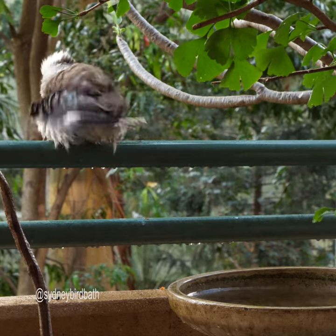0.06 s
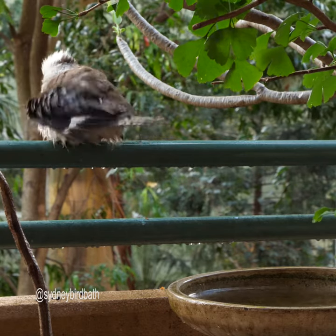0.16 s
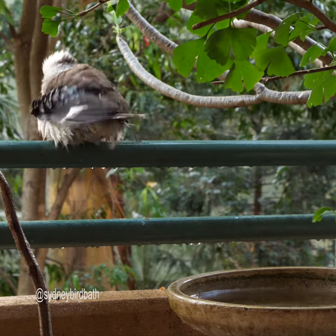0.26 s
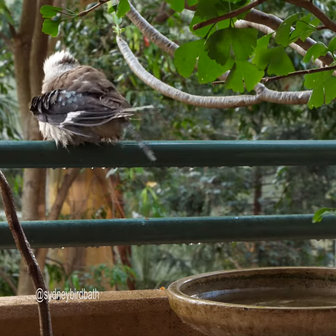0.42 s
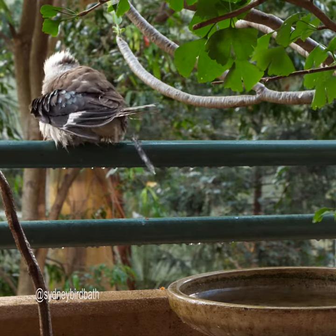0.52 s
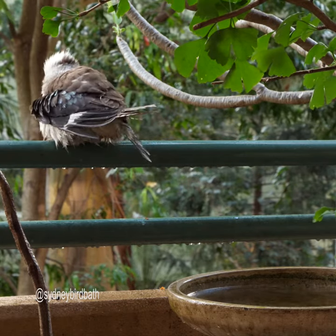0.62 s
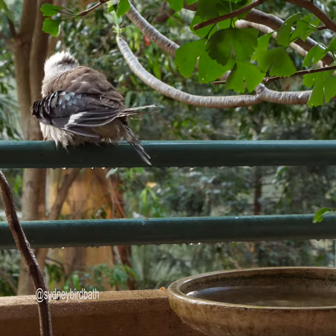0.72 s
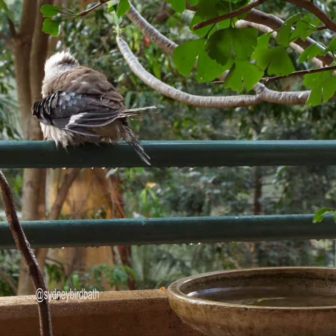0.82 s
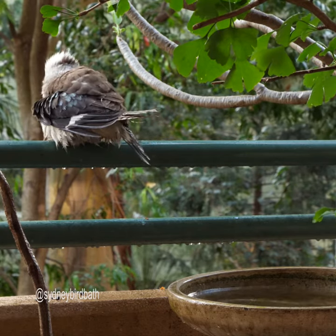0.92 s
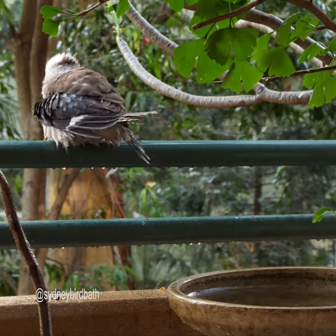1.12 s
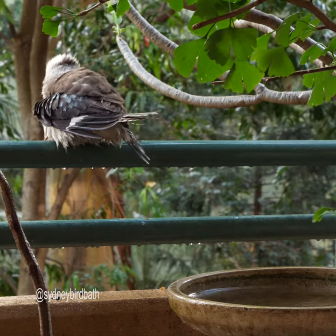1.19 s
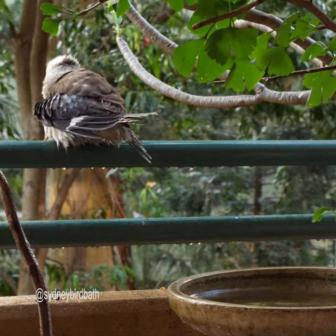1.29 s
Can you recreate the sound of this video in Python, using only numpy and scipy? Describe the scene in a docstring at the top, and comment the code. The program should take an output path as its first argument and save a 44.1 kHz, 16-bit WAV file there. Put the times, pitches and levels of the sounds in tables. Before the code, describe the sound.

A kookaburra opens with a rasping grumble dotted with soft clucks. At about 0.4 seconds it gives one harsh, hissing squawk that fades by 0.7 with a slight garden echo. Wind rumbles low on the microphone, mostly from 0.5 to 1 second. Just after 1 second a small bird whistles faintly far off, and quick, wheezy kookaburra clucks run into another rasp from about 1.2 seconds.

```python
"""A rasping grumble with soft clucks in it comes from a kookaburra on a garden railing; then one harsh,
hissing squawk, a pause, and clucks that run into another rasp. Uneven pulses of turbulent air excite
the resonances of its throat, clearing into two tones for each cluck; nearby walls and trees answer.
A small bird whistles faintly far off, and wind rumbles on the microphone."""
import sys
import numpy as np
from scipy import signal
from scipy.fft import rfft, irfft, next_fast_len
from scipy.io import wavfile
from scipy.ndimage import uniform_filter1d, map_coordinates

SR = 44100
rng = np.random.default_rng(int(sys.argv[2]) if len(sys.argv) > 2 else 0)


def waveform_to_disk(signal):
    """Save audio, clipped to [-1, 1], as 16-bit WAV at the path in sys.argv[1]."""
    frames = np.transpose(np.atleast_2d(signal))
    scaled = np.clip(frames, -1, 1) * 32767
    samples = np.round(scaled).astype(np.int16)
    wavfile.write(sys.argv[1], SR, samples)


N = 59535

# Left-right coherence of the voice and echo, and of the clucks and last rasp: f/Hz, coherence
VOICE_COHERENCE = [(700, 0.81), (1200, 0.76), (1700, 0.7), (2100, .05), (2700, 0.48), (3800, -0.26),
                   (6000, -0.12), (9000, -0.081)]
CLUCK_COHERENCE = [(1300, 0.78), (2400, 0.79), (4200, 0.6), (5500, 0.28)]


def amp(db):
    """Decibels to amplitude ratio."""
    return 10 ** (np.asarray(db) / 20)

def unit(x):
    """Normalisation to rms 1."""
    return x / np.sqrt(np.mean(x ** 2) + 1e-20)

def along(points, hz):
    """Interpolation on a logarithmic frequency axis."""
    f, values = np.transpose(points)
    return np.interp(np.log(hz + 1), np.log(f + 1), values)

def curves(rows):
    """Linear interpolation in time, one curve for each column after the first."""
    times, *columns = np.transpose(rows)
    return [np.interp(np.arange(N) / SR, times, column) for column in columns]

def during(rows, fade_s=0.013):
    """Trapezoidal window: 1 over the rows' time span, fading on either side."""
    t = np.arange(N) / SR
    return np.clip(1 + np.minimum(t - rows[0][0], rows[-1][0] - t) / fade_s, 0, 1)

def wobble(rate):
    """Random modulation: a spline through `rate` random knots a second."""
    return map_coordinates(rng.standard_normal(int(N * rate / SR) + 4), [np.arange(N) * rate / SR])

def filtered(x, response):
    """Linear filtering: the spectrum times a frequency response."""
    size = next_fast_len(N + SR // 2)
    return irfft(rfft(x, size) * response(np.fft.rfftfreq(size, 1 / SR)), size)[..., :N]

def resonances(table, hz):
    """Gain of steep-sided resonances that add in power, with little below the first."""
    power = sum(amp(db) ** 2 / (1 + ((hz - centre) / (.75 * width)) ** 2) ** 3
                for centre, width, db in table)
    return np.sqrt(power / (1 + (.7 * table[0][0] / (hz + 1)) ** 8))

def spread(pair, coherence):
    """Mid-side mixing gives two independent signals a set left-right coherence."""
    angle = lambda hz: np.arccos(np.clip(along(coherence, hz), -1, 1)) / 2
    mid, side = filtered(pair, lambda hz: np.array([np.cos(angle(hz)), np.sin(angle(hz))]))
    return np.array([mid + side, mid - side])

def steady(x, window_s=0.013):
    """Division by the running rms evens out the chance swells of a noise."""
    power = uniform_filter1d(np.mean(x ** 2, 0), int(window_s * SR))
    return x / np.sqrt(np.abs(power) + 1e-20)

def garden(level_db=-52):
    """Ambient noise: steady, and coherent between the ears only at low frequencies."""
    spectrum = [(59, -9.5), (100, -3.5), (209, -10.5), (290, -11.5), (600, -19), (760, -18), (916, -23),
                (1960, -24.5), (15500, -34.5)]  # f/Hz, relative level/dB
    coherence = [(300, 0.99), (1200, 0.87), (2500, 0.01)]  # f/Hz, left-right coherence
    air = filtered(rng.standard_normal((2, N)), lambda hz: amp(along(spectrum, hz)))
    return amp(level_db) * unit(spread(air, coherence))

def wind(buffet_trim_db=-1, drift=0.059, side_db=-33):
    """Pressure fluctuations of wind: a deep throb and softer buffeting, nearly alike in both ears."""
    throb_pitch = [(0.0, 28), (.3, 31.1), (.55, 28), (.8, 25.3), (.88, 17.7), (1.05, 21), (1.35, 20.8)]  # t/s, f/Hz
    throb_levels = [(0.0, -48.5), (0.282, -29.5), (0.42, -42), (0.506, -21), (0.54, -18), (0.646, -21),
                    (0.676, -35.5), (0.714, -17.5), (0.74, -17), (0.774, -26), (0.816, -17.5), (0.864, -27),
                    (0.906, -21), (1.048, -34.5), (1.16, -37), (1.35, -49)]  # t/s, level/dB
    buffet_spectrum = [(20, -37), (45, 7), (60, 0.5), (85, 2.5), (110, -22), (135, -5.5), (200, -23),
                       (400, -26), (900, -86)]  # f/Hz, relative level/dB
    buffet_levels = [(0, -47.5), (.13, -58), (.245, -40), (.3, -44.5), (.58, -48.5), (.63, -42), (.76, -43),
                     (1.0, -51), (1.35, -54.5)]  # t/s, level/dB before the trim
    pitch = curves(throb_pitch)[0] * np.exp(drift * wobble(12))
    throb = unit(np.sin(2 * np.pi * np.cumsum(pitch) / SR))
    mid, side = unit(filtered(rng.standard_normal((2, N)), lambda hz: amp(along(buffet_spectrum, hz))))
    buffet = steady(np.array([mid + amp(side_db) * side, mid - amp(side_db) * side]), window_s=0.051)
    return amp(curves(throb_levels)[0]) * throb + amp(curves(buffet_levels)[0] + buffet_trim_db) * buffet

def echo(x, level_db=-5.5):
    """Reverberation: reflections from walls and trees decay exponentially, the midrange slowest."""
    decay_times = [(500, 0.13), (1400, 0.82), (4000, 0.83), (8000, 0.59), (14000, 0.31)]  # f/Hz, T60/s
    hz, t, noise = signal.stft(rng.standard_normal((2, SR)), SR, nperseg=256)
    tail = signal.istft(noise * amp(-60 * t / along(decay_times, hz)[:, None]), SR, nperseg=256)[1]
    reflections = signal.fftconvolve(x, tail / np.linalg.norm(tail[0]), axes=1)[:, :N]
    return amp(level_db) * spread(reflections, VOICE_COHERENCE)

def far_bird(waver=0.0112, flutter_db=4.0):
    """Two faint, overlapping whistles glide under random frequency and amplitude modulation."""
    # Whistled notes: t/s, f/Hz, level/dB
    upper_note = [(1.025, 3180, -71), (1.047, 3380, -74), (1.061, 3520, -57), (1.078, 3350, -74),
                  (1.095, 3345, -58.5), (1.13, 2880, -66)]
    lower_note = [(1.065, 2740, -66), (1.093, 3020, -61)]
    out = np.zeros(N)
    for note in (upper_note, lower_note):
        pitch, level = curves(note)
        tone = np.sin(2 * np.pi * np.cumsum(pitch * (1 + waver * wobble(300))) / SR)
        out += amp(level + flutter_db * wobble(150)) * during(note) * unit(tone)
    return out

def hiss(levels, band):
    """Turbulent air, filtered by a resonance, swells and fades."""
    air = filtered(rng.standard_normal((2, N)), lambda hz: resonances(band, hz))
    return amp(curves(levels)[0]) * during(levels) * steady(spread(air, VOICE_COHERENCE))

def wheeze():
    """Turbulence in two high resonances: a thin hiss that leads into the later clucks."""
    levels = [(1.0, -71), (1.04, -58.5), (1.2, -60)]  # t/s, level/dB
    band = [(2786, 860, -9.5), (5540, 760, -6.5)]  # resonances: f/Hz, nominal width/Hz, relative level/dB
    return hiss(levels, band)

def chest(voice, relative_db=-20):
    """Amplitude modulation: a weak, low rush follows the envelope of the voice."""
    band = [(278, 42, 1.5), (441, 146, -2)]  # resonances: f/Hz, nominal width/Hz, relative level/dB
    envelope = np.sqrt(np.abs(uniform_filter1d(np.mean(voice ** 2, 0), size=900)))
    rush = unit(filtered(rng.standard_normal(N), lambda hz: resonances(band, hz)))
    return amp(relative_db) * envelope * rush

def hollow_note(pitch_hz=866, waver=0.0158):
    """A nearly pure tone, slightly frequency-modulated, sounds through the last rasp."""
    levels = [(1.24, -68), (1.265, -51.5), (1.3, -47.5), (1.35, -66)]  # t/s, level/dB
    tone = np.sin(2 * np.pi * np.cumsum(pitch_hz * (1 + waver * wobble(149))) / SR)
    return amp(curves(levels)[0]) * during(levels) * unit(tone)

def syrinx(coherence, pulse_hz, jitter, rattle):
    """Pulse-modulated turbulence: air let through in uneven puffs, their depth set by `rattle`."""
    cycles = np.cumsum(pulse_hz * np.exp(jitter * wobble(pulse_hz))) / SR
    puffs = np.exp(rattle * np.cos(2 * np.pi * cycles))
    return spread(puffs * rng.standard_normal((2, N)), coherence)

def call(levels, throat, source, low_trim_db, treble_trim_db, crossover_hz=2760):
    """Source-filter model: the source excites the throat; low and treble bands swell separately."""
    treble_share = lambda hz: 1 / (1 + (crossover_hz / (hz + 1)) ** 16)
    low = steady(filtered(source, lambda hz: resonances(throat, hz) * (1 - treble_share(hz))))
    treble = steady(filtered(source, lambda hz: resonances(throat, hz) * treble_share(hz)))
    low_db, treble_db = curves(levels)
    return during(levels) * (amp(low_db + low_trim_db) * low + amp(treble_db + treble_trim_db) * treble)

def grumble():
    """Strongly jittered pulses excite broad formants: the opening rasp."""
    levels = [(0.0, -44, -49.5), (.034, -49.5, -52.5), (.084, -45.5, -48.5), (.13, -49, -53.5),
              (.165, -47.5, -50.5), (.234, -46.5, -57.5), (.274, -44, -47.5), (.304, -47.5, -48),
              (.37, -60, -59.5)]  # t/s, low level/dB, treble level/dB, before the trims
    throat = [(810, 330, -16), (1308, 475, 0), (1953, 320, -1.5), (2980, 260, -11.5), (4070, 900, -9),
              (5410, 390, -12), (6300, 2050, -18.5), (9500, 4600, -28)]  # formants: f/Hz, nominal width/Hz, relative level/dB
    source = syrinx(VOICE_COHERENCE, pulse_hz=251.3, jitter=0.62, rattle=0.14)
    return call(levels, throat, source, low_trim_db=0.5, treble_trim_db=2.5)

def rasp():
    """Faster, deeper modulation of the airflow roughens the closing call."""
    levels = [(1.212, -41, -54), (1.22, -51, -48), (1.24, -41, -45.5), (1.251, -51, -49.5),
              (1.266, -38.5, -41), (1.287, -40.5, -40), (1.325, -47, -50), (1.35, -37, -41)]  # t/s, low level/dB, treble level/dB, before the trims
    throat = [(857, 130, -9), (1294, 320, 1), (1840, 170, -3), (2123, 220, -1), (2570, 130, -9),
              (3080, 240, -18.5), (4030, 680, -6), (4360, 200, -1.5), (5400, 550, -10.5), (6100, 1840, -18),
              (8860, 3700, -26)]  # formants: f/Hz, nominal width/Hz, relative level/dB
    source = syrinx(CLUCK_COHERENCE, pulse_hz=417.8, jitter=0.2, rattle=0.52)
    return call(levels, throat, source, low_trim_db=-2, treble_trim_db=0)

def clucks(upper_ratio=1.62, waver=0.0258, attack_s=0.0041, release_s=0.0076):
    """Two inharmonic partials share each short note's power with turbulence in a half-closed throat."""
    # t/s, time to release/s, level/dB, f/Hz, upper partial re lower/dB, air's share of the power
    notes = [(.001, 0.011, -48, 1343, -6, 0.5), (0.055, .007, -47.5, 1382, -12, .25),
             (.095, 0.0074, -44.5, 1182, -16, 0.1), (0.151, 0.019, -43.5, 1270, -12, 0.2),
             (0.2, 0.005, -44.5, 1316, -12, 0.4), (0.341, 0.0054, -47, 1260, -13, 0.07),
             (1.076, 0.014, -54.5, 1390, -3, .2), (1.086, 0.0063, -44, 1389, -0.5, 0.15),
             (1.104, 0.019, -52.5, 1400, -5, 0.76), (1.124, 0.027, -48, 1412, -6, 0.9),
             (1.141, 0.011, -47, 1330, 3, 0.27), (1.154, 0.027, -47, 1335, -4, 0.9),
             (1.177, 0.013, -44, 1384, -17, .45), (1.195, 0.0096, -48.5, 1420, -16, 0.8),
             (1.214, 0.0055, -39, 1380, -13, 0.4), (1.226, 0.015, -39, 1301, -2, 0.31),
             (1.26, 0.015, -39.5, 1320, -2.5, 0.27)]
    throat = [(1353, 430, 2.5), (2074, 340, -3.5), (2740, 1300, -15.5), (4200, 430, -11.5),
              (6000, 5400, -24)]  # formants: f/Hz, nominal width/Hz, relative level/dB
    t = np.arange(N) / SR
    source = syrinx(CLUCK_COHERENCE, pulse_hz=310.4, jitter=0.165, rattle=0.32)
    air = steady(filtered(source, lambda hz: resonances(throat, hz)))
    lower_clock, upper_clock = [np.cumsum(1 + waver * wobble(400)) / SR for _ in range(2)]
    out = np.zeros((2, N))
    for onset, hold, db, hz, upper_db, air_share in notes:
        attack = np.clip((t - onset) / attack_s, 0, 1)
        release = np.exp(-np.maximum(t - onset - hold, 0) / release_s)
        lower = np.sin(2 * np.pi * hz * lower_clock)
        upper = amp(upper_db) * np.sin(2 * np.pi * hz * upper_ratio * upper_clock)
        blend = np.sqrt(1 - air_share) * unit(lower + upper) + np.sqrt(air_share) * air
        out += amp(db) * attack * release * blend
    return out

def squawk():
    """Turbulence excites narrow formants; hiss edges the onset and a lower resonance joins later."""
    levels = [(0.37, -54.5, -60.5), (0.392, -39.5, -45), (0.414, -39, -41), (0.466, -42, -46),
              (0.536, -63, -55.5), (0.61, -52, -63), (0.7, -62.5, -66)]  # t/s, low level/dB, treble level/dB, before the trims
    # Envelopes of the high hiss and the lower resonance: t/s, level/dB
    edge_levels = [(.385, -57), (.402, -66), (.414, -56), (.435, -67)]
    gape_levels = [(.412, -57), (.435, -48), (.47, -49.5), (.5, -60)]
    # Resonances of throat and beak: f/Hz, nominal width/Hz, relative level/dB
    throat = [(1040, 99, 2.5), (1214, 98, 2.5), (1367, 180, -1.5), (1556, 140, 0.5), (1780, 190, -6.5),
              (2070, 160, -6), (2620, 230, -7.5), (3030, 270, -1), (3570, 230, 2), (4120, 890, -3.5),
              (5210, 240, -4), (5640, 290, -5), (6700, 1700, -13), (8750, 3500, -19.5)]
    edge_band = [(9400, 7000, 0)]
    gape_band = [(881, 167, 0)]
    source = syrinx(VOICE_COHERENCE, pulse_hz=375.7, jitter=0.4, rattle=0.089)
    cry = call(levels, throat, source, low_trim_db=1, treble_trim_db=4)
    return cry + hiss(edge_levels, edge_band) + hiss(gape_levels, gape_band)

def kookaburra():
    """The calls add into one voice, placed by an interaural level difference."""
    balance = [(1200, -1.7), (2300, -0.5), (4300, -0.4), (9000, 2.1)]  # f/Hz, left re right level/dB
    voice = grumble() + squawk() + clucks() + rasp() + hollow_note()
    placed = filtered(voice, lambda hz: amp(np.outer([.5, -.5], along(balance, hz))))
    return placed + chest(voice) + wheeze()

def scene():
    """Superposition of the birds, their echo, wind and garden air."""
    birds = kookaburra() + far_bird()
    return birds + echo(birds) + wind() + garden()

def record(dry, cutoff_hz=15650):
    """Band limiting by an ideal low-pass filter."""
    return filtered(dry, lambda hz: hz < cutoff_hz)


dry = scene()
out = record(dry)
waveform_to_disk(out)
```